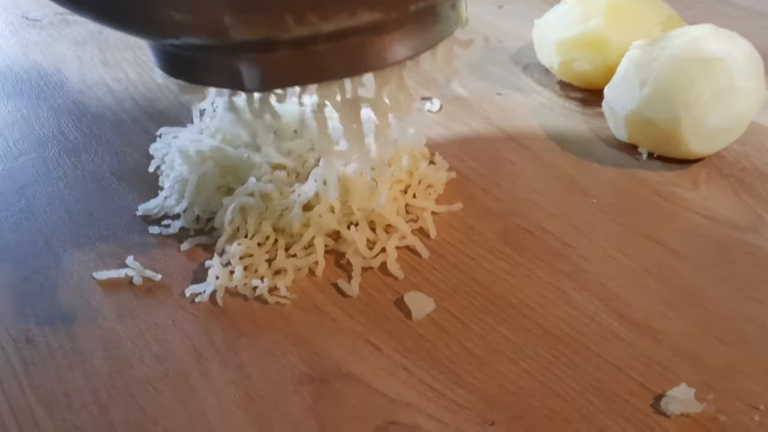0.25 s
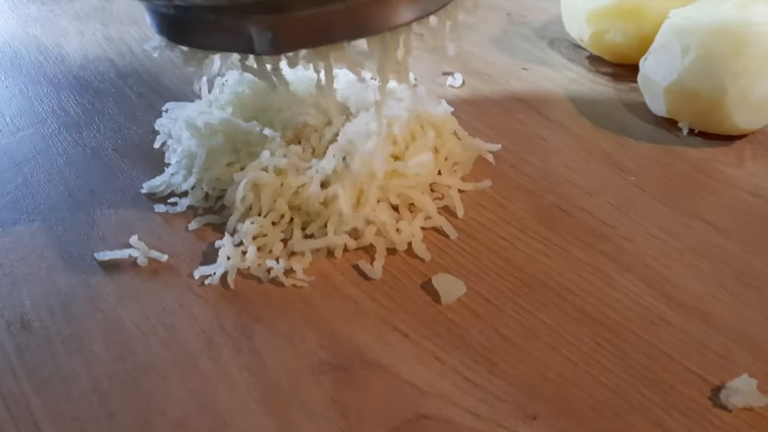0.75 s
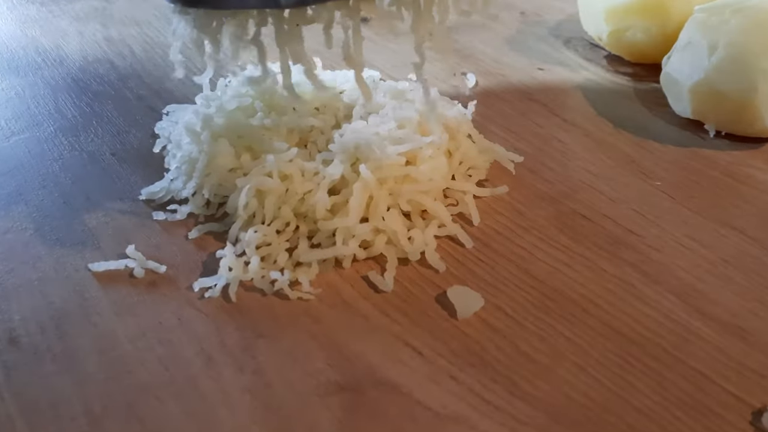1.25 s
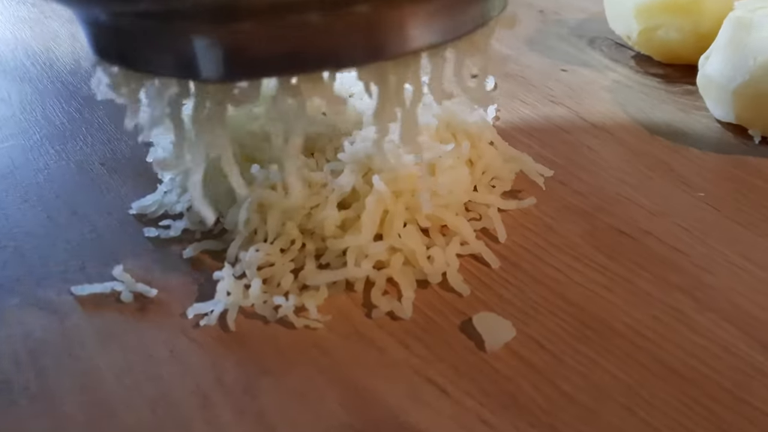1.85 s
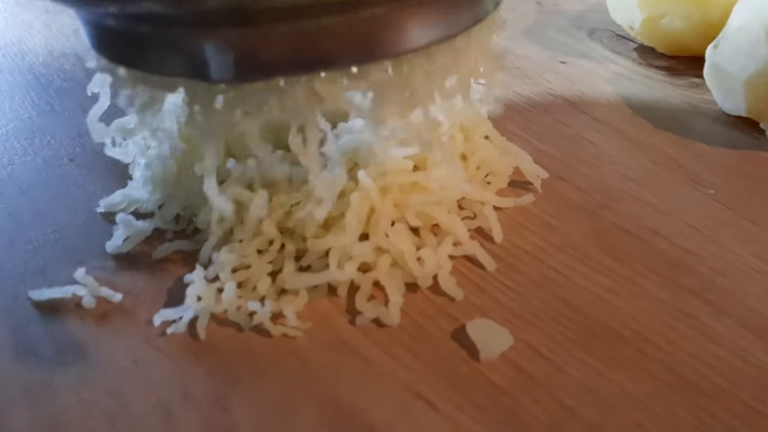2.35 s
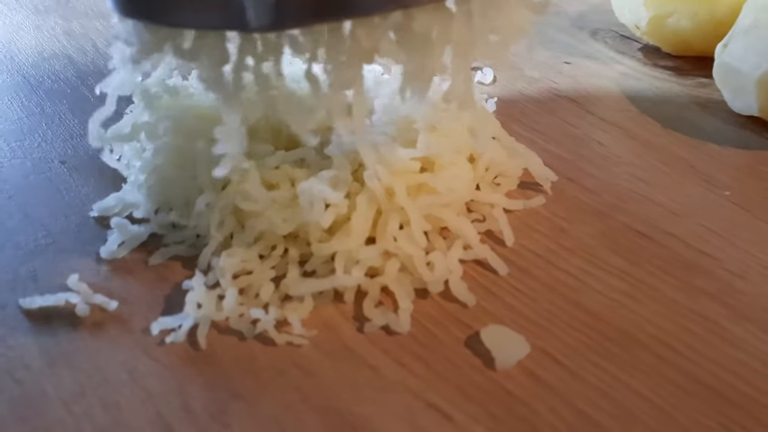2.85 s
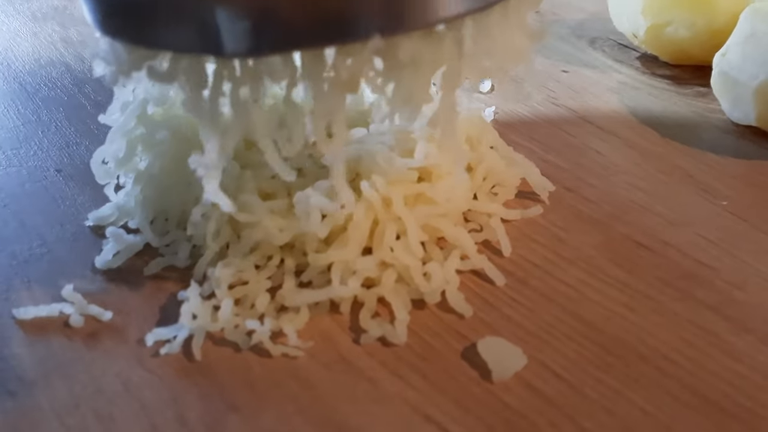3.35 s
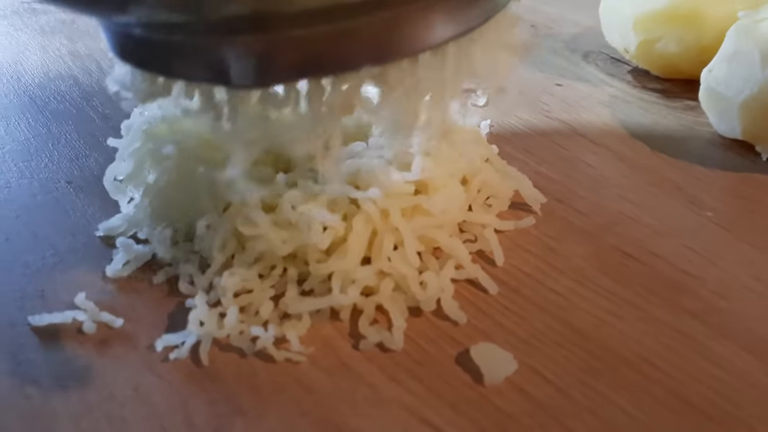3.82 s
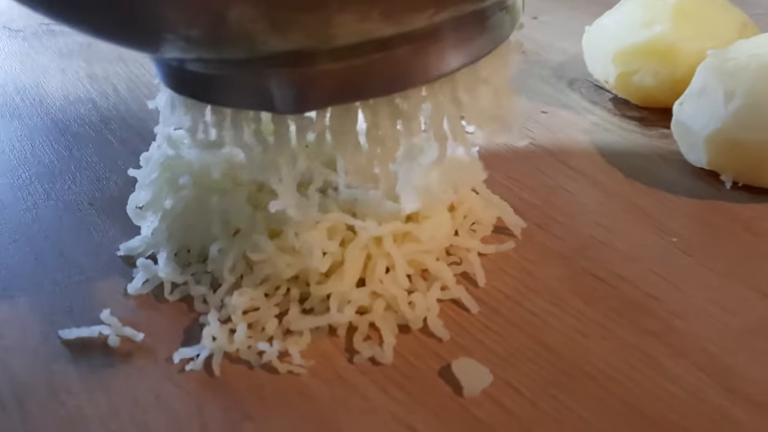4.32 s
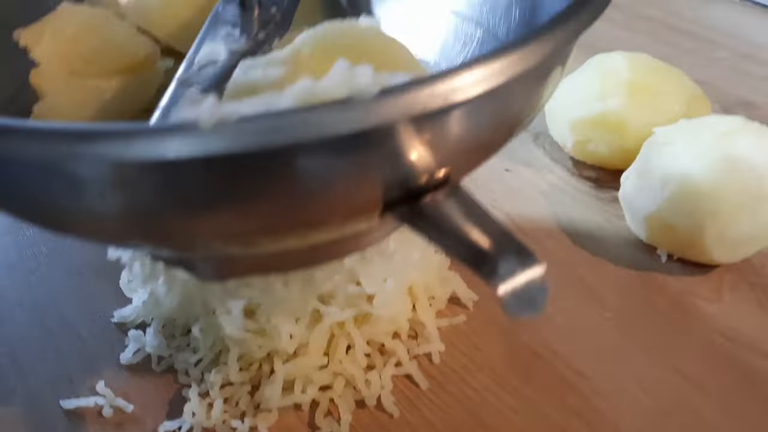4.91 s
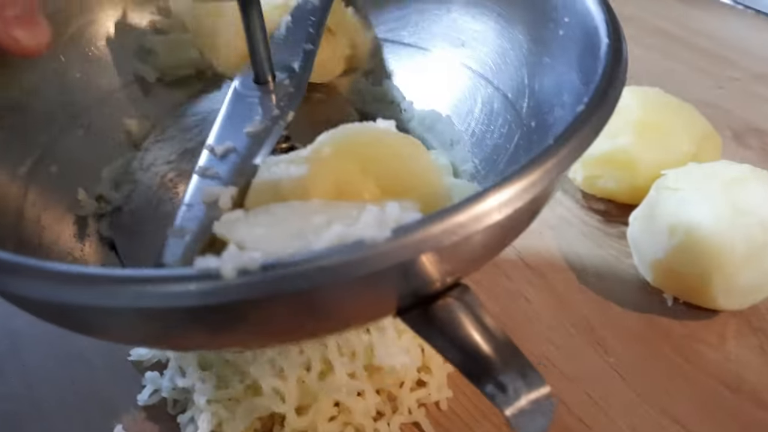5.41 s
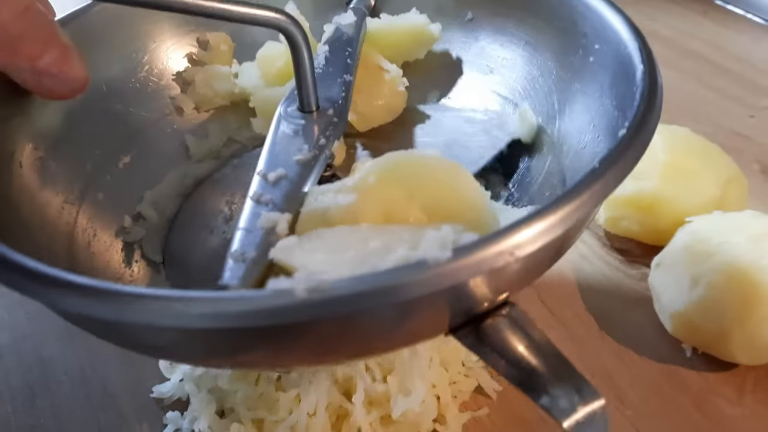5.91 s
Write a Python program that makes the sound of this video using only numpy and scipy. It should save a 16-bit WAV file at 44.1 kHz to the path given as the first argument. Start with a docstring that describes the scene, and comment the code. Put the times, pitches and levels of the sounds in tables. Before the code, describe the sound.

Close stereo pickup of a hand-cranked steel food mill in a small kitchen. A push is just ending, then two longer grinding strokes, two short hard ones and a final long one follow. The blade scrapes, sings and clacks around a damped ringing bowl, with raspy holes and rumbling mash. Pauses hold faint wet ticks over a very quiet fridge hum.

```python
"""A food-mill push is already under way, with a fridge hum behind it: potatoes pressed in six crank pushes.
The blade sticks and slips over a perforated plate; random slips drive resonances and coloured noise.
The blade sings in a gliding band and clacks where it catches, the damped steel bowl rings, the holes rasp,
the mash rumbles, bright snaps and scrapes stand out. Between pushes the wet mash ticks softly.
Board reflections and a short kitchen tail surround the mill; the fridge is a sum of slow-beating tones."""
import sys
import numpy as np
from scipy import signal
from scipy.fft import rfft, irfft, next_fast_len
from scipy.io import wavfile
from scipy.ndimage import uniform_filter1d

SR = 44100
rng = np.random.default_rng(int(sys.argv[2]) if len(sys.argv) > 2 else 0)


def put_to_file(sound):
    """Save the sound as 16-bit audio at rate SR, in the file named by the first command-line argument."""
    columns = np.atleast_2d(sound).T  # one column per channel
    safe = np.clip(columns, -1, 1)
    whole_steps = np.round(safe * 32767)
    wavfile.write(sys.argv[1], SR, whole_steps.astype(np.int16))


N = 272097
TIME = np.arange(N) / SR


def from_db(db):
    """Decibels to gain."""
    return 10 ** (np.asarray(db) / 20)


def at_hz(points, hz):
    """Read a table on a log-frequency axis."""
    table = np.array(points)
    return np.interp(np.log(np.maximum(hz, 1)), np.log(table[:, 0]), table[:, 1])


def drift(knots_per_s):
    """Slow random wander with spread 1."""
    knots = rng.standard_normal(N // 20)
    wander = np.interp(TIME * knots_per_s, np.arange(len(knots)), knots)
    return wander / wander.std()


def causal(gain):
    """Minimum-phase response: the given gain per bin, never sounding early."""
    cepstrum = irfft(np.log(gain))
    half = cepstrum.shape[-1] // 2
    cepstrum[..., 1:half] *= 2
    cepstrum[..., half + 1:] = 0
    return np.exp(rfft(cepstrum))


def colour(x, spectrum, size=4096):
    """Causal filter with the given spectrum; white noise keeps its power."""
    hz = np.arange(size // 2 + 1) * SR / size
    response = irfft(causal(from_db(at_hz(spectrum, hz))))
    response /= np.linalg.norm(response)
    return signal.fftconvolve(x, response[None], axes=1)[:, :N]


def resonate(x, hz, width_hz):
    """One damped mode; white noise keeps its power."""
    r = np.exp(-np.pi * width_hz / SR)
    numerator = np.sqrt((1 - r * r) / 2) * np.array([1, 0, -1])
    denominator = [1, -2 * r * np.cos(2 * np.pi * hz / SR), r * r]
    return signal.lfilter(numerator, denominator, x + 1e-18)


def slips(per_s, spread_db):
    """Stick-slip as random clicks of uneven size, own strength at each microphone; rms 1."""
    sizes = from_db(spread_db * np.minimum(rng.exponential(1, N), 4))
    clicks = (rng.random(N) < per_s / SR) * sizes * rng.standard_normal((2, N))
    return clicks / clicks.std()


def stutter(per_s, jump_db, decay_s):
    """Lumps give way at random: each lifts the scraping at once and lets it sink back; rms 1."""
    lumps = (rng.random(N) < per_s / SR) * rng.uniform(0.33, 1, N)
    sinking = signal.lfilter([1], [1, -np.exp(-1 / (decay_s * SR))], lumps + 1e-18)
    level = 1 + from_db(jump_db) * sinking
    return level / np.sqrt(np.mean(level ** 2))


def chatter(bursts, size=4096):
    """Bursts of fine chatter, instant start and exponential decay; rows of (s, dB, decay s)."""
    level, age_s = np.zeros(N + SR), np.arange(size) / SR
    for start_s, db, decay_s in bursts:
        at = max(int(start_s * SR), 0)
        level[at:at + size] += from_db(db) * np.exp(-age_s / decay_s)
    return level[:N] * rng.choice([-1, 1], (2, N))


# Room noise spectrum. Each row: frequency in Hz, relative density in dB per Hz.
ROOM_TONE = [(24, -30), (45, -2.5), (90, -4), (130, 0.5), (190, -5.5), (245, -0.5), (330, 3.5), (430, -2),
             (620, -5), (830, 2), (980, -3), (1150, -11), (2300, -21), (4000, -30.5), (18000, -16.5)]


def room_air():
    """Steady room tone: coloured white noise."""
    return from_db(-57.0) * colour(rng.standard_normal((2, N)), ROOM_TONE)


# Fridge motor harmonics. Each row: multiple of shaft speed, level in dB.
MOTOR = [(2, -64.5), (3, -75), (5, -84)]
# Faint fridge whine. Each row: frequency in Hz, level in dB.
WHINE = [(237, -75), (247.6, -72)]
MAINS_HZ, SHAFT_HZ = 50, 49.27


def fridge(mains_db, swell_s):
    """The motor runs just under mains speed, so its hum beats slowly against the mains hum."""
    turn = 2 * np.pi * (TIME - swell_s)
    motor = sum(from_db(db) * np.cos(round(k) * (SHAFT_HZ * turn + 0.011 * drift(4.4))) for k, db in MOTOR)
    whine = sum(from_db(db) * np.cos(hz * turn + drift(2.38)) for hz, db in WHINE)
    mains = from_db(mains_db) * np.cos(2 * MAINS_HZ * turn)
    return np.sqrt(2) * (motor + whine + mains)


KITCHEN_T60_S, KITCHEN_DB, WALL_CUT_HZ = 0.29, -7, 4700


def kitchen(x):
    """A short, slightly dull room tail: decaying noise, low-passed."""
    age_s = TIME[:SR // 2]
    tail = rng.standard_normal((2, len(age_s))) * from_db(-60 * age_s / KITCHEN_T60_S) * (age_s > .006)
    tail /= np.linalg.norm(tail, axis=1, keepdims=True)
    tail = signal.sosfilt(signal.butter(1, WALL_CUT_HZ, fs=SR, output="sos"), tail)
    return x + from_db(KITCHEN_DB) * signal.fftconvolve(x, tail, axes=1)[:, :N]


def board(x, board_db, board_s, sway_s, size=4096):
    """Quick reflections between bowl and board add a metallic ripple that shifts as the mill sways."""
    hop, age_s = size // 4, TIME[:size]
    out = np.zeros((2, N + 2 * size))
    keep = np.exp(-hop / SR / sway_s)
    # reflections are kept above 1 kHz, the bass stays plain
    above_bass = signal.butter(2, 1000, "high", fs=SR, output="sos")
    echoes = rng.standard_normal((2, size))
    for at in range(0, N, hop):
        echoes = keep * echoes + np.sqrt(1 - keep ** 2) * rng.standard_normal((2, size))
        dying = echoes * np.exp(-age_s / board_s)
        dying = signal.sosfilt(above_bass, dying / np.linalg.norm(dying, axis=1, keepdims=True))
        paths = rfft((age_s == 0) + from_db(board_db) * dying)
        # divide out the broad colour, keep the ripple
        broad = np.sqrt(uniform_filter1d(np.abs(paths) ** 2, size=45, axis=1))
        paths /= causal(broad)
        out[:, at:at + size] += irfft(paths * rfft(x[:, at:at + hop], size))
    return out[:, :N]


# Microphone pair. Each row: frequency in Hz, likeness of the channels (-1 to 1).
LIKENESS = [(100, 0.8), (400, 0.73), (750, 0.48), (1000, 0), (1500, -.2), (2600, 0), (10000, 0), (10400, 1)]
# Channel balance. Each row: frequency in Hz, left minus right in dB.
BALANCE_DB = [(100, -1), (300, 1.5), (1000, 4), (2200, 3.5), (3800, 5.5), (4900, 0.5), (6500, -3.5),
              (7900, 3.5), (9000, 5.5), (10000, 10), (11200, 12), (12000, 5.5), (13300, 5), (13800, 3.5),
              (16500, -4), (17500, -13)]


def microphones(x):
    """The two channels are alike in the bass and the top treble, and each has its own colour."""
    size = next_fast_len(N + SR // 10)
    spectrum, hz = rfft(x, size), np.arange(size // 2 + 1) * SR / size
    blend = np.arcsin(np.clip(at_hz(LIKENESS, hz), -1, 1)) / 2
    sides = from_db(at_hz(BALANCE_DB, hz) * np.array([[.5], [-.5]]))
    sides /= np.sqrt(np.mean(sides ** 2, axis=0))
    mixed = np.cos(blend) * spectrum + np.sin(blend) * spectrum[::-1]
    return irfft(sides * mixed, size)[:, :N]


# Wet mash oozing, heard between pushes. Each row: time in s, level in dB.
OOZE = [(.48, -61), (.62, -58.5), (2.0, -62.5), (2.1, -59.5), (2.2, -59), (3.8, -61.5), (3.92, -62),
        (3.98, -52), (4.6, -71), (5.0, -51), (5.09, -56.5), (5.28, -56)]


def ooze():
    """Wet mash ticks: sparse uneven clicks under a drifting level."""
    level = from_db(np.interp(TIME, *np.transpose(OOZE)))
    return level * slips(per_s=1800, spread_db=3.0) * from_db(2.0 * drift(12.0))


# Pushes of the crank. Each row: start in s, end in s, first bite in dB, last scrape in dB, mash in dB,
# rasp in dB, mash drain in dB per s, rasp fade in dB per s, blade singing time in s,
# its early share of the ring's power (0-1), thud over mash in dB, plate in dB, left minus right in dB.
PUSHES = [(0, 0.363, -76, -34.5, -73, -46, 0, -19, 0.22, 0.32, -5, 2.5, -1.5),
          (.683, 1.838, -31, -39, -50.5, -44.5, 5.5, -2, 0.39, 0.28, -3.5, 1.5, -0.5),
          (2.304, 3.628, -42, -30.5, -50, -42.5, 1, 2, 0.37, 0.43, -0.5, 1, 0.5),
          (4.021, 4.501, -37.5, -28.5, -49.5, -40.5, 11.5, 1, 0.27, 0.46, -0.5, -1, 0),
          (4.639, 4.931, -36.5, -32, -59, -50, -13, -4, 0.69, 0.79, -5.5, 5, -0.5),
          (5.31, 6.25, -42, -47, -50.5, -40.5, 4.5, 5, 0.13, 0.33, -10.5, 0, 0.5)]
# Blade pressure as the steel answers it, one list per push.
# Each row: time in s, ring in dB, ring centre in Hz.
PRESSURE = [
    [(0.0, -49, 1640), (0.115, -43.5, 1650), (0.15, -50.5, 1650), (0.3, -47, 1530), (0.35, -45, 1730)],
    [(0.69, -51, 1880), (0.708, -37, 2050), (0.8, -38.5, 1840), (0.905, -35, 1860), (0.945, -36.5, 1840),
     (1.02, -42, 1920), (1.23, -41.5, 1760), (1.27, -35.5, 1670), (1.33, -46, 1760), (1.42, -45.5, 1900),
     (1.52, -43.5, 1700), (1.69, -53.5, 1760), (1.778, -41.5, 2100), (1.82, -47, 1840)],
    [(2.31, -42.5, 2330), (2.338, -41, 2330), (2.44, -46, 2260), (2.538, -35.5, 2370), (2.7, -35, 2310),
     (2.78, -43, 1940), (3.0, -41.5, 2020), (3.11, -45, 2060), (3.19, -47.5, 2020), (3.37, -40.5, 2020),
     (3.425, -46.5, 2100), (3.48, -39.5, 2230), (3.62, -38.5, 2150)],
    [(4.03, -40, 1520), (4.05, -43, 1670), (4.16, -39, 1970), (4.24, -35.5, 2250), (4.3, -34.5, 2160),
     (4.335, -34.5, 1820), (4.39, -34, 1970), (4.46, -37, 1820), (4.51, -31.5, 1540)],
    [(4.645, -46, 1760), (4.675, -43.5, 1600), (4.73, -41.5, 1700), (4.84, -48, 1620), (4.88, -37, 1580),
     (4.93, -48, 1620)],
    [(5.315, -40, 1720), (5.37, -34, 1900), (5.412, -35, 1650), (5.45, -39.5, 1760), (5.54, -34, 2020),
     (5.61, -33.5, 1880), (5.75, -40, 1760), (5.83, -39.5, 1950), (5.933, -48, 1850), (6.17, -42.5, 1920)],
]
USUAL_RING_DB = -40
MASH_DB_PER_DB, RASP_DB_PER_DB = 0.42, 0.59   # per dB of ring above its usual level
BITE_S, LAST_SCRAPE_S = 0.062, 0.059   # bare steel at both ends of a push: fade and swell
LET_GO_S, SETTLE_DB, SETTLE_S = 0.0074, -12.5, 0.052   # the blade stops fast, the mash settles slower
PACK_S = 0.049   # the potato packs under the blade, then drains through the holes
# under light pressure the blade glides on mash and the rasp falls faster
GLIDE_BELOW_DB, GLIDE_DB_PER_DB = -6.5, 0.39


def crank():
    """A push bites, grinds, scrapes bare, lets go: gains of mash, ring, rasp; blade share; ring centre."""
    mash, ring, rasp, share = np.zeros((4, N))
    centre_hz = np.full(N, PRESSURE[0][0][2])
    for push, curve in zip(PUSHES, PRESSURE):
        start_s, end_s, bite_db, last_db, mash_db, rasp_db = push[:6]
        drain_db_per_s, fade_db_per_s, sing_s, sing_share = push[6:10]
        s, ring_db, hz = np.transpose(curve)
        effort_db = np.interp(TIME, s, ring_db) - USUAL_RING_DB
        age_s, left_s, after_s = np.maximum([TIME - start_s, end_s - TIME, TIME - end_s], 0)
        started = TIME >= start_s
        moving = started * np.exp(-after_s / LET_GO_S)
        settling = started * np.exp(-after_s / SETTLE_S)
        contact = np.maximum(moving, from_db(SETTLE_DB) * settling)
        bite = from_db(bite_db) * np.exp(-age_s / BITE_S)
        last_scrape = from_db(last_db) * np.exp(-left_s / LAST_SCRAPE_S)
        packed = (1 - np.exp(-age_s / PACK_S)) * from_db(-drain_db_per_s * age_s)
        glide_db = GLIDE_DB_PER_DB * np.minimum(effort_db - GLIDE_BELOW_DB, 0)
        grinding_db = rasp_db + RASP_DB_PER_DB * effort_db + glide_db - fade_db_per_s * age_s
        ring += contact * from_db(USUAL_RING_DB + effort_db)
        mash += settling * packed * from_db(mash_db + MASH_DB_PER_DB * effort_db)
        rasp += np.hypot(contact * from_db(grinding_db), moving * (bite + last_scrape))
        share += moving * sing_share / (1 + (age_s / sing_s) ** 4)
        centre_hz = np.where(started, np.interp(TIME, s, hz), centre_hz)   # blade rests where it stopped
    return mash, ring, rasp, np.clip(share, 0, .95), centre_hz


def grip():
    """The hold on the mill stays the same through a push and shifts in the pauses."""
    start_s, end_s, *_, thud_db, plate_db, pan_db = np.transpose(PUSHES)
    edges_s = np.column_stack([start_s, end_s]).ravel()
    return [np.interp(TIME, edges_s, np.repeat(column, 2)) for column in (thud_db, plate_db, pan_db)]


# Mash spectrum, then thud spectrum. Each row: frequency in Hz, relative density in dB per Hz.
MASH = [(200, -15), (400, -10), (540, -2), (660, -0.5), (820, 3), (980, -1), (1170, -9.5), (1450, 1.5),
        (3000, -48)]
THUD = [(60, -24), (145, 2), (210, -3.5), (300, 4.5), (420, -4), (600, -5.5), (1500, -52)]


def squashed_mash(mash, crunch, knock, thud_db):
    """Yielding mash rumbles with the crunch of lumps and thuds below it."""
    squash = from_db(2.5) * mash * crunch * slips(per_s=3000, spread_db=1.5) + from_db(-11.0) * knock
    thud = from_db(thud_db - 6.0) * mash * slips(per_s=1600, spread_db=-1.5)
    return colour(squash, MASH) + colour(thud, THUD)


# Bright snaps: wet pops in the mash, and the blade's jolt as a push stops.
# Each row: start in s, level in dB, decay in s, lower edge in Hz.
BRIGHT_SNAPS = [(0.204, -26, 0.0016, 4000), (0.444, -34.5, 0.00091, 4000), (1.589, -22, 0.009, 12600),
                (1.815, -25.5, 0.0079, 9000), (1.829, -18, 0.0028, 9500), (2.026, -37, 0.0007, 3100),
                (2.035, -38.5, 0.00089, 4000), (2.0965, -37, 0.00052, 4000), (2.1402, -31.5, 0.00065, 3000),
                (2.442, -31, .0015, 12100), (3.6326, -14, 0.0024, 8550), (4.5005, -21, 0.0033, 8000),
                (4.931, -19.5, 0.0042, 8100), (4.972, -34, .002, 5000), (5.411, -17, .003, 9500)]


def bright_snaps(size=4096):
    """Each pop or jolt is a high-passed noise burst that starts at once and decays exponentially."""
    out, age_s = np.zeros((2, N + SR)), np.arange(size) / SR
    for start_s, db, decay_s, low_hz in BRIGHT_SNAPS:
        burst = from_db(db) * np.exp(-age_s / decay_s) * rng.choice([-1, 1], (2, size))
        edge = signal.butter(2, low_hz, "high", fs=SR, output="sos")
        at = int(start_s * SR)
        out[:, at:at + size] += signal.sosfilt(edge, burst)
    return out[:, :N]


# The blade catches on the plate. Each row: time in s, ring in dB, clack centre in Hz, snap in dB.
CATCHES = [(0.8836, -34, 2000, -46), (0.895, -31, 1910, -46), (0.9659, -26, 1910, -39),
           (1.2484, -33, 1700, -48), (2.338, -32, 2340, -32), (2.5227, -27, 2300, -49),
           (2.606, -34, 2350, -45), (2.629, -26.5, 2350, -27), (3.469, -34.5, 2280, -50),
           (3.9593, -30, 2070, -44), (4.11, -31, 1900, -36), (4.155, -30.5, 1900, -44),
           (4.2339, -30, 2040, -33), (4.3186, -21.5, 2000, -23), (4.3465, -28.5, 1890, -26),
           (4.383, -44, 2000, -24.5), (4.4628, -30, 1870, -26), (5.0367, -40, 1590, -45),
           (5.1932, -43, 1990, -40.5), (5.405, -28, 1610, -41), (5.6517, -27.5, 1700, -42),
           (5.8056, -27, 2260, -29.5), (5.8581, -29, 1970, -32)]
CATCH_S = 0.0058   # decay
CLACK_DB, CLACK_OCTAVES = -1.5, 0.57   # level offset, band width
CLACK_STRIKE = 4   # first strike against the chatter after it


def clacks(size=4096):
    """A caught blade springs free: one strike and a short chatter in a band set by where it caught."""
    out, age_s = np.zeros((2, N + SR)), np.arange(size) / SR
    for start_s, db, hz, _ in CATCHES:
        force = np.exp(-age_s / CATCH_S) * rng.choice([-1, 1], (2, size))
        force[:, 0] *= CLACK_STRIKE
        low_hz, high_hz = hz * 2 ** (CLACK_OCTAVES * np.array([-.5, .5]))
        band = signal.butter(2, [low_hz, high_hz], "band", fs=SR, output="sos")
        gain = from_db(db + CLACK_DB) * np.sqrt(SR / 2 / (high_hz - low_hz))
        at = int(start_s * SR)
        out[:, at:at + size] += gain * signal.sosfilt(band, force)
    return out[:, :N]


BITE_RING_DB, BITE_SNAP_DB = -10, -3   # the catch that starts a push, against its bite
SNAP_RING_DB = -17   # a bright snap barely knocks the bowl


def catches():
    """Catches and bright snaps also knock the bowl; a push starts with a catch."""
    caught = [(s, ring_db, snap_db) for s, ring_db, _, snap_db in CATCHES]
    caught += [(s, db + BITE_RING_DB, db + BITE_SNAP_DB) for s, _, db, *_ in PUSHES]
    snap = chatter([(s, db, CATCH_S) for s, _, db in caught])
    caught_knocks = [(s, db, CATCH_S) for s, db, _ in caught]
    snap_knocks = [(s, db + SNAP_RING_DB, decay_s) for s, db, decay_s, _ in BRIGHT_SNAPS]
    return snap + bright_snaps(), chatter(caught_knocks + snap_knocks)


# Brief bright scrapes, narrow or broad.
# Each row: start in s, length in s, frequency in Hz, width in Hz, level in dB.
BRIGHT_SCRAPES = [(0.681, 0.069, 8050, 600, -37), (1.446, 0.22, 6900, 1500, -45),
                  (2.933, 0.25, 12000, 2500, -47.5), (3.264, 0.28, 6460, 1300, -48),
                  (4.04, 0.13, 12600, 600, -51), (4.086, 0.45, 6300, 700, -46),
                  (4.418, 0.028, 7960, 400, -35), (4.423, .018, 12000, 3500, -34),
                  (4.852, 0.057, 5860, 500, -43), (5.324, 0.088, 6700, 1100, -45)]


def bright_scrapes():
    """Noise bands that swell and fade: random clicks through one resonance each."""
    force = slips(per_s=4400, spread_db=3.0)
    out = 0
    for start_s, length_s, hz, width_hz, db in BRIGHT_SCRAPES:
        progress = np.clip((TIME - start_s) / length_s, 0, 1)
        swell = np.sqrt(np.abs(np.sin(np.pi * progress)))
        out = out + from_db(db) * resonate(force * swell, hz, width_hz)
    return out


def holes(x, patchy_db, per_s, count=14):
    """Holes clog and clear as the blade passes: each part of the treble swells and fades by itself."""
    size = next_fast_len(N)
    spectrum, hz = rfft(x, size), np.arange(size // 2 + 1) * SR / size
    centres_hz, out = np.geomspace(2500, 16000, count), 0
    for band in np.eye(count):
        gain = from_db(patchy_db * drift(per_s))
        gain /= np.sqrt(np.mean(gain ** 2))
        out = out + irfft(spectrum * np.interp(hz, centres_hz, band), size)[:, :N] * gain
    return out


# Plate spectrum, then rasp spectrum. Each row: frequency in Hz, relative density in dB per Hz.
PLATE = [(1200, -20), (2200, 9.5), (2900, 5), (3500, 2), (4800, -4), (5400, -3.5), (5750, 1), (6200, 3.5),
         (6750, 3.5), (7300, 2), (8000, 4.5), (8450, 2), (9000, -17.5), (11000, -4.5)]
RASP = [(1500, -14), (4000, -3.5), (7000, 0), (8000, 8), (9000, -2), (9900, 0), (10700, 2.5), (11400, 2),
        (12500, 2.5), (14000, -0.5), (16300, 0), (17100, 0), (18200, 1)]


def perforated_plate(ring, rasp, judder, crunch, knock, wet, plate_db):
    """The plate answers both to the pressure and to the fine scraping; the hole edges rasp."""
    edge = rasp * judder * crunch * slips(per_s=6000, spread_db=0.5)
    drive = rasp * (ring / (rasp + 1e-9)) ** .5   # geometric mean of ring and rasp
    scrape = from_db(plate_db - 3.5 + 1.0 * drift(25)) * crunch * drive * slips(per_s=2600, spread_db=2.0)
    scrape = scrape + from_db(-12.0) * knock + from_db(-6.0) * wet
    return holes(colour(scrape, PLATE) + colour(edge, RASP), patchy_db=2.5, per_s=22)


# Steel bowl modes, damped by the mash. Each row: frequency in Hz, width in Hz, relative level in dB.
BOWL = [(1393, 35, 2), (1534, 114, 7), (1700, 74, 2), (1760, 620, 4), (1840, 134, 3), (1920, 920, 3.5),
        (2310, 150, 5), (2387, 56, -0.5), (2500, 120, 2), (2670, 170, -1)]


def bowl(force, centre_hz, reach_octaves, far_db):
    """The blade's place on the plate decides which modes of the bowl it drives most."""
    weights = []
    for hz, _, db in BOWL:
        near = np.exp(-(np.log2(hz / centre_hz) / reach_octaves) ** 2)
        weights.append(from_db(db) * (from_db(far_db) + near))
    weights = np.array(weights) / np.linalg.norm(weights, axis=0)
    ring = 0
    for (hz, width_hz, _), weight in zip(BOWL, weights):
        signs = rng.choice([-1, 1], (2, N))   # every slip meets each mode with a sign of its own
        ring = ring + resonate(force * weight * signs, hz, width_hz)
    return signal.sosfilt(signal.butter(2, [1250, 4500], "band", fs=SR, output="sos"), ring)


BLADE_POLE_HZ, BLADE_WOBBLE_OCTAVES = 131, 0.034   # damping of each of two poles, spread of the wobble


def blade(force, centre_hz):
    """One resonance whose pitch glides and wobbles as the blade bends; white noise keeps its power."""
    pitch_hz = centre_hz * 2 ** (BLADE_WOBBLE_OCTAVES * drift(45))
    turn = np.exp(2j * np.pi * np.cumsum(pitch_hz) / SR)
    r = np.exp(-2 * np.pi * BLADE_POLE_HZ / SR)
    gain = np.sqrt(2 * (1 - r * r) ** 3 / (1 + r * r))
    # shift the band to 0 Hz, filter, shift back
    return gain * np.real(turn * signal.lfilter([1], [1, -2 * r, r * r], force / turn + 1e-18))


# Spectrum of snaps and wet ticks. Each row: frequency in Hz, relative density in dB per Hz.
SNAP = [(1500, -15.5), (3800, -6.5), (6500, 2), (8000, 4), (9300, -6.5), (11000, 1), (13500, -1.5),
        (18000, 2.5)]


def mill():
    """Stick-slip of the blade drives the bowl, the perforated plate and the mash together."""
    mash, ring, rasp, share, centre_hz = crank()
    thud_db, plate_db, pan_db = grip()
    snap, knock = catches()
    wet = ooze()
    judder = from_db(1.2 * drift(70))   # the blade bumps over the rows of holes
    crunch = stutter(per_s=67, jump_db=-4.5, decay_s=0.0067)
    stick_slip = ring * judder * stutter(per_s=150, jump_db=3, decay_s=0.00092)
    stick_slip = stick_slip * slips(per_s=2500, spread_db=0.5)
    sing = from_db(3) * np.sqrt(share) * stick_slip
    grind = from_db(-0.2) * np.sqrt(1 - share) * stick_slip
    grind = grind + from_db(-1.5) * knock + from_db(-4.5) * wet
    bowl_hz = centre_hz * 2 ** (0.063 * drift(14))
    sound = squashed_mash(mash, crunch, knock, thud_db) + colour(snap + wet, SNAP) + clacks()
    sound = sound + perforated_plate(ring, rasp, judder, crunch, knock, wet, plate_db)
    sound = sound + bowl(grind, bowl_hz, reach_octaves=0.34, far_db=-6.5) + blade(sing, centre_hz)
    return sound * from_db(pan_db * np.array([[.5], [-.5]]))


def scene():
    """The mill in the kitchen, over room tone and the fridge."""
    on_board = board(mill() + bright_scrapes(), board_db=0.0, board_s=0.0046, sway_s=0.27)
    milling = from_db(1.5) * kitchen(on_board)
    hum = fridge(mains_db=-67.5, swell_s=0.27) * from_db([[-1], [1]])   # left, right
    return microphones(milling + room_air()) + hum


CUTOFF_HZ = 18200


def record(dry):
    """The lowest rumble is rolled off and the top is cut steeply."""
    dry = signal.sosfilt(signal.butter(3, 33, "high", fs=SR, output="sos"), dry)
    return signal.sosfilt(signal.ellip(10, .1, 80, CUTOFF_HZ, fs=SR, output="sos"), dry)


dry = scene()
out = record(dry)
put_to_file(out)
```